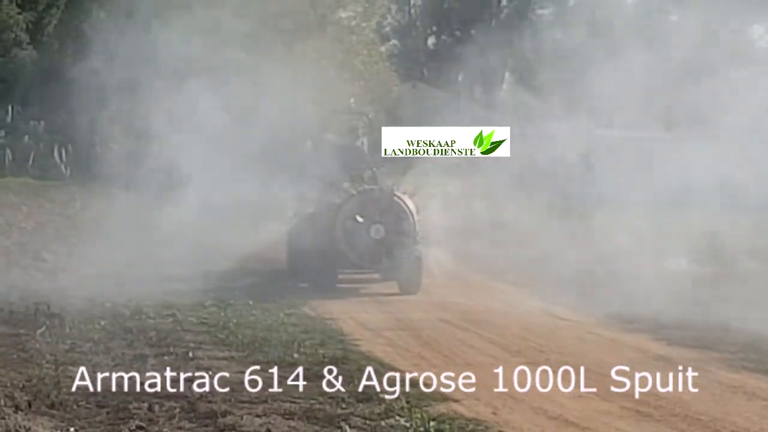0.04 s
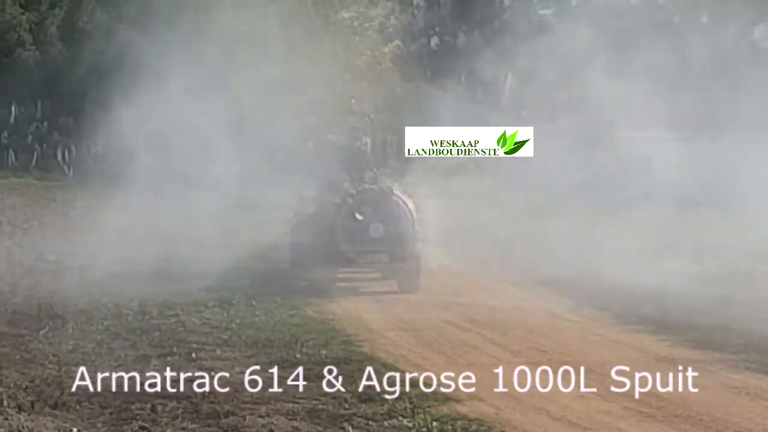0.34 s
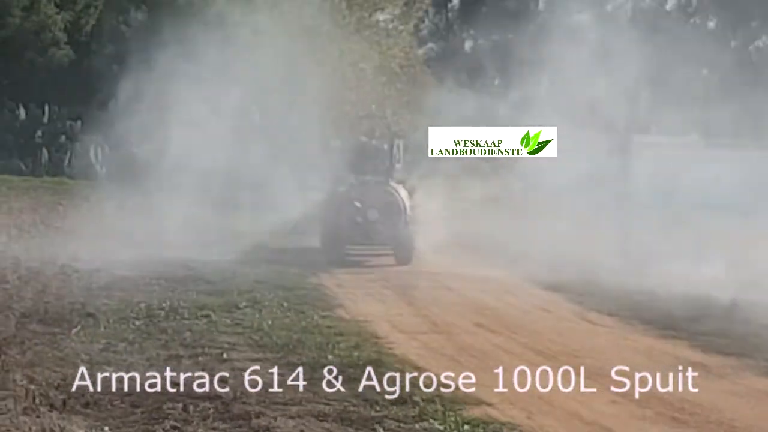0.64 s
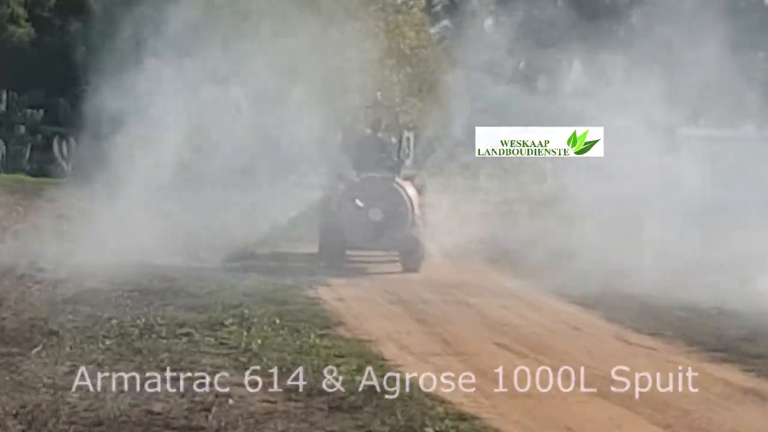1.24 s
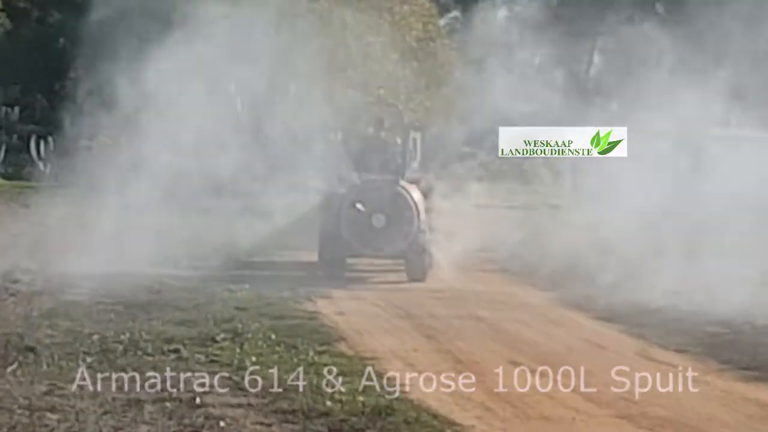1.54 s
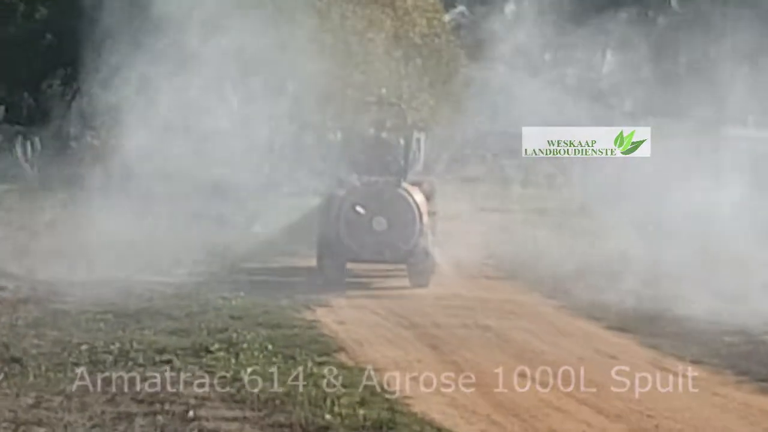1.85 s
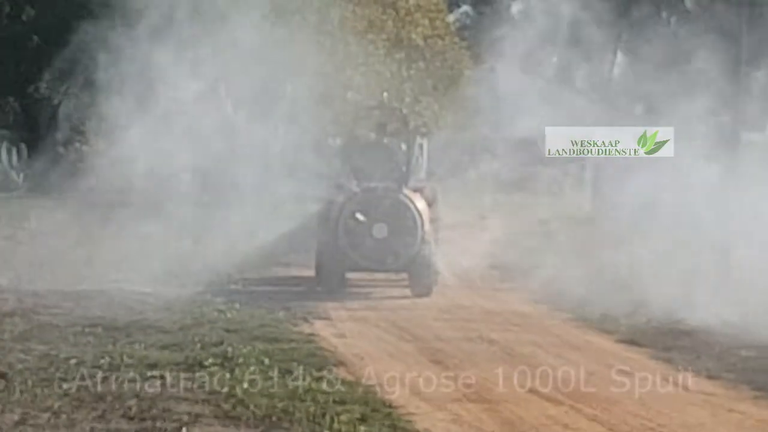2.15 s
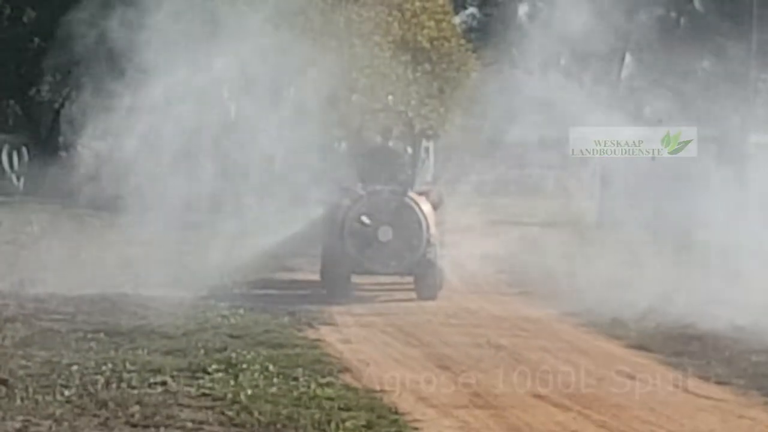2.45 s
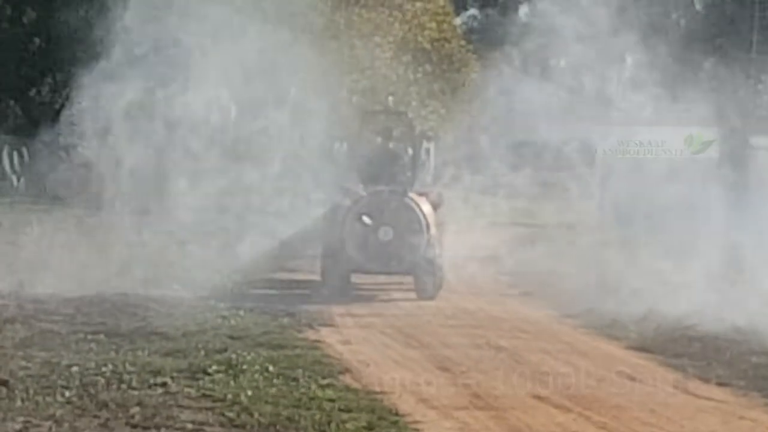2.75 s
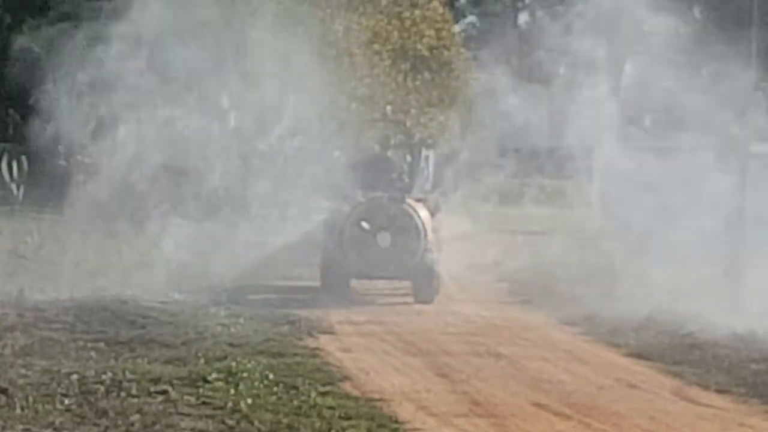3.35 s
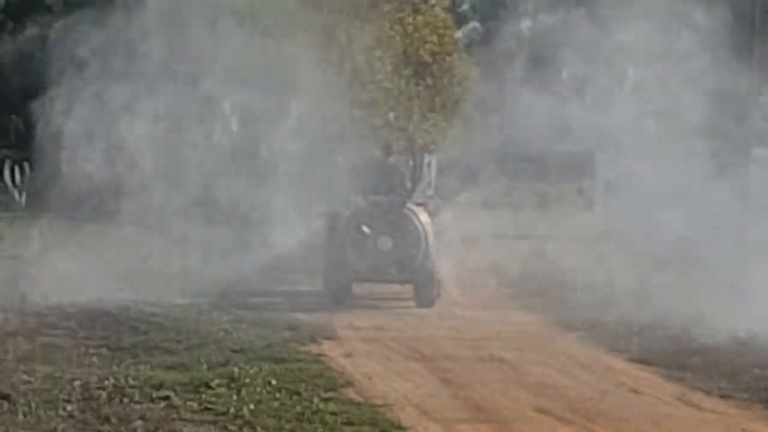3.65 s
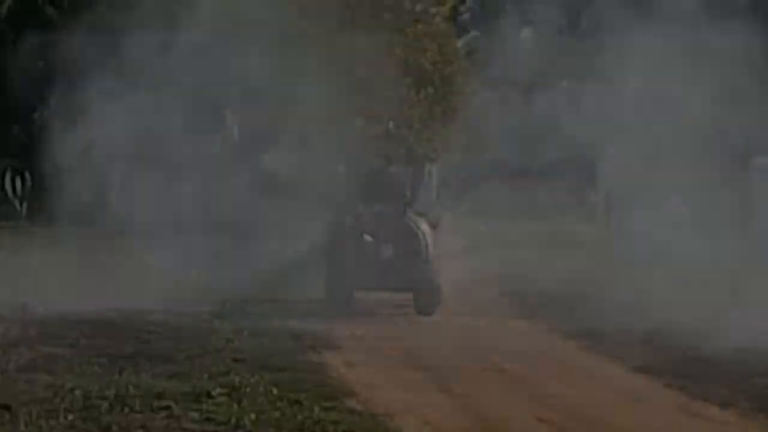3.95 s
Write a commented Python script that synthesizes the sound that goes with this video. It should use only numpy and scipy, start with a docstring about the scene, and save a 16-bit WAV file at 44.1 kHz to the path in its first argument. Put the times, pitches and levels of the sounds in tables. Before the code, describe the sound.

Loud, steady roar of a crop sprayer fan and hissing nozzles behind a humming tractor.

```python
"""A tractor towing an orchard sprayer.

The sprayer runs at full speed as the tractor crawls away along a dirt track. Churning air in its fan
booms and rushes, with a wavering blade tone and two breathy duct rings inside the noise. The engine
hums below, with a faint drive whine and a breeze. Air and spray hiss from the nozzles, swelling and
dulling as the machine moves off. Two microphone ports (openings) close together pick it all up."""
import sys
import numpy as np
from scipy import signal
from scipy.fft import rfft, irfft
from scipy.io import wavfile
from scipy.ndimage import uniform_filter1d, minimum_filter1d

SR = 44100
rng = np.random.default_rng(int(sys.argv[2]) if len(sys.argv) > 2 else 0)


def to_wav(sig):
    """Store sig (one row per channel, or 1-D mono) as 16-bit WAV at the path in sys.argv[1].

    Samples outside -1..1 are clipped; the rate is SR.
    """
    pcm = np.clip(np.atleast_2d(sig), -1, 1) * 32767
    pcm = np.round(pcm).astype(np.int16)
    wavfile.write(sys.argv[1], SR, pcm.T)  # frames by channels


N = 176400  # 4 seconds
TIME = np.arange(N) / SR
FREQS = np.fft.rfftfreq(N, 1 / SR)
FRAMES = dict(nperseg=1024, noverlap=768)  # cuts sound into short overlapping slices


def gain_of(db):
    """Turns decibels into a number to multiply by."""
    return 10 ** (np.asarray(db) / 20)


def unit_level(x):
    """Scales a signal so that its average power is 1."""
    return x / np.sqrt(np.mean(abs(x) ** 2) + 1e-20)


def over_pitch(table):
    """Joins a table's rows into a curve over all frequencies, spaced by octaves."""
    hz, value = np.transpose(table)
    return np.interp(np.log(FREQS + 1), np.log(hz + 1), value)


def over_time(table, times=TIME):
    """Joins a table's rows into a curve over time."""
    return np.interp(times, *np.transpose(table))


def wander(rate_hz):
    """A smooth random wobble, up to about the given rate."""
    smoothing = np.exp(-(FREQS / rate_hz) ** 2) * (FREQS > 0)
    return unit_level(irfft(rfft(rng.standard_normal(N)) * smoothing, N))


def noise_spectra(shape):
    """The spectra of two unrelated noises, both shaped by one table."""
    return rfft(rng.standard_normal((2, N))) * gain_of(over_pitch(shape))


# Which port is louder. Each row: frequency in Hz, left minus right in dB.
PORT_BALANCE = [(40, 2), (130, .3), (320, -.7), (440, -.2), (650, -.6), (900, -1.8), (1050, 0),
                (1450, -1.7), (1720, -1), (1900, -3.5), (2250, -1.3), (2520, -3.7), (2780, -3.8),
                (3050, 1.7), (3250, -.2), (3440, 3.5), (3850, 2.5), (4200, -1), (4600, -1.5), (4900, -4.3),
                (5200, -2), (5600, -6), (6100, -7.5), (6800, 1), (7400, -.8), (8600, 5), (10000, 1),
                (11300, 3.5), (12600, -4), (14200, -4), (15500, 0)]
# Which port hears a wave first. Each row: frequency in Hz, the left one's lead in radians.
PORT_LEAD = [(30, -.15), (90, -.26), (260, -.18), (400, -.11), (780, -.19), (970, 0), (1150, -.25),
             (1600, -.26), (1780, -.48), (2100, -.25), (2450, -.64), (2900, -.77), (3150, .15), (3380, .5),
             (3520, -.4), (3700, -.3), (4050, -.97), (4400, -.7), (4700, -1.05), (5000, -.7), (5400, -1.1),
             (6050, -.65), (6400, .15), (6750, .1), (7050, -1), (7400, -.45), (8200, -1.2), (9200, -3),
             (13000, -3.5), (15000, -2)]

def ports(left, right):
    """Turns two spectra into stereo sound, with the ports' differences in level and timing."""
    lean = gain_of(over_pitch(PORT_BALANCE) / 2) * np.exp(.5j * over_pitch(PORT_LEAD))
    return irfft(np.array([left * lean, right / lean]), N)


# How alike the two ports sound. Each row: frequency in Hz, likeness from 0 to 1.
PORT_LIKENESS = [(30, .96), (120, .996), (300, .999), (440, .989), (650, .994), (950, .976), (1200, .986),
                 (1780, .96), (2050, .975), (2600, .84), (3200, .91), (3440, .6), (3700, .86), (5000, .8),
                 (6000, .64), (6600, .82), (7100, .6), (8000, .63), (9500, .52), (15000, .45)]

def turbulence(shape):
    """Churning air: noise that is nearly the same at both ports in the bass, less so higher up."""
    shared, separate = noise_spectra(shape)
    likeness = np.clip(over_pitch(PORT_LIKENESS), 0, 1)
    right = likeness * shared + np.sqrt(1 - likeness ** 2) * separate
    return unit_level(ports(shared, right))


def moving_air(sound, drift, drift_weight, flutter_db, flutter_hz, patchy_db):
    """Air on the way sways the level: a slow drift, a quick flutter and small random patches."""
    hz, times, slices = signal.stft(sound, SR, **FRAMES)
    patches = uniform_filter1d(rng.standard_normal(slices.shape[1:]), size=14, axis=0)  # across pitch
    patches = unit_level(uniform_filter1d(patches, size=16, axis=1))  # across time
    flutter = np.interp(times, TIME, wander(flutter_hz))
    drift_db = drift_weight(hz)[:, None] * over_time(drift, times)
    change_db = drift_db + flutter_db * flutter + patchy_db * patches
    return signal.istft(slices * gain_of(change_db), SR, **FRAMES)[1][:, :N]


def stirred_tone(hz, db, unsteady, stir_hz):
    """A tone whose strength and timing are stirred by the air."""
    stir = (wander(stir_hz) + 1j * wander(stir_hz)) / np.sqrt(2)
    steady = np.exp(2j * np.pi * np.cumsum(hz) / SR)
    return gain_of(db) * unit_level(((1 + unsteady * stir) * steady).real)


# The breeze's rumble. Each row: frequency in Hz, relative level in dB.
BREEZE_SHAPE = [(10, -3), (30, 0), (60, 4), (90, 6), (140, -6), (300, -32)]

def breeze(db=-56):
    """Light wind rumbles on each port separately."""
    gusts_db = 2.5 * wander(4)
    return gain_of(db + gusts_db) * unit_level(irfft(noise_spectra(BREEZE_SHAPE), N))


def drive_whine(speed, hz=463):
    """The spinning drive gives one faint, unsteady note."""
    return stirred_tone(hz * speed, db=-48, unsteady=0.71, stir_hz=3.6)


# The notes in the engine's hum. Each row: multiple of the crank's turning rate, level in dB.
ENGINE_NOTES = [(1, -60.5), (2, -46.5), (3, -43)]

def engine_hum(speed, crank_hz=40.9):
    """The engine hums at the rate its crank turns, and at multiples of it."""
    return sum(stirred_tone(multiple * crank_hz * speed, db, unsteady=0.22, stir_hz=2.5)
               for multiple, db in ENGINE_NOTES)


# The blades' notes. Each row: multiple of the blade rate, base level in dB, wobble (0 is steady).
BLADE_NOTES = [(1, -28, 0.23), (2, -43, 1.1)]
# How the blade tone comes and goes. Each row: time in seconds, level change in dB.
BLADE_SWELLS = [(0, -4), (.17, -14), (.25, 9.5), (.52, 7), (.8, 8.5), (.95, -1), (1.15, 2), (1.42, 1),
                (1.85, -11.5), (2.03, -0.5), (2.4, 2), (2.6, -7), (2.85, 2), (3.05, -8), (3.3, 2),
                (3.8, 4.5), (4, -6)]

def blade_tone(speed, blade_hz=329):
    """Each passing fan blade pushes the air, and the pushes blend into a wavering tone."""
    notes = sum(stirred_tone(multiple * blade_hz * speed, db, unsteady, stir_hz=9.6)
                for multiple, db, unsteady in BLADE_NOTES)
    return notes * gain_of(over_time(BLADE_SWELLS))


# How the duct's low and high rings come and go. Each row: time in seconds, level change in dB.
LOW_RING_SWELLS = [(0, 6), (.25, 3.5), (.5, 4), (.63, -1), (.76, 2.5), (.95, -5), (1.12, -1), (1.3, -1),
                   (1.45, -2), (1.8, -3), (1.98, 1.5), (2.35, 2), (2.57, -9), (2.8, 2), (3.3, -6),
                   (3.52, 1.5), (3.72, -3), (4, -4)]
HIGH_RING_SWELLS = [(0, 1), (.35, 1), (.5, 4.5), (1.1, -7), (1.35, -1), (1.55, -3), (1.85, 1), (2.1, -2),
                    (2.55, -4), (2.85, 3.5), (3.15, -3), (3.55, 0), (4, -15)]

def duct_ring(swells, hz, width_hz, db):
    """The air stream makes the fan's duct ring with a fluttering, breathy whine."""
    flutter = wander(width_hz) + 1j * wander(width_hz)
    ring = unit_level((flutter * np.exp(2j * np.pi * hz * TIME)).real)
    spectrum = rfft(ring * gain_of(db + over_time(swells)))
    return ports(spectrum, spectrum)


# The echo off the ground, whose dips climb in pitch as the machine moves away.
# Each row: time in seconds, spacing of the dips in Hz, echo strength from 0 to 1.
GROUND_BOUNCE = [(0, 2900, .16), (.22, 3060, 0.2), (.6, 3100, 0.02), (1.5, 3250, 0), (2.4, 3400, 0),
                 (3.1, 3600, 0), (3.4, 3750, .28), (4, 3680, 0.2)]

def ground_echo(sound, scatter_hz=7500):
    """Soft ground sends back an upside-down echo that weakens evenly spaced frequencies."""
    hz, times, slices = signal.stft(sound, SR, **FRAMES)
    when, dip_hz, strength = np.transpose(GROUND_BOUNCE)
    scattering = 1 + (hz[:, None] / scatter_hz) ** 4  # rough ground returns less treble
    echo = np.interp(times, when, strength) / scattering
    delay = np.exp(-2j * np.pi * hz[:, None] / np.interp(times, when, dip_hz))
    return signal.istft(slices * (1 - echo * delay), SR, **FRAMES)[1][:, :N]


# The spray's hiss. Each row: frequency in Hz, relative level in dB.
HISS_SHAPE = [(1500, -29), (2500, -2.5), (2790, 4), (3000, -2), (3220, 5.5), (3440, -2.5), (3620, 2),
              (4400, 1.4), (5400, 0.2), (5800, -9), (6100, -8.5), (6830, -18.5), (7400, -13.2), (8000, -12),
              (8900, -19.5), (9900, -28.5), (11300, -22), (12600, -38), (14400, -23), (15100, -36),
              (15600, -37)]
# How the hiss swells and fades. Each row: time in seconds, level change in dB at centre_hz.
HISS_SWELLS = [(0, 0), (.2, 3), (.42, 1.4), (.6, 2.2), (.75, 0.9), (1.03, 1.4), (1.2, 0.3), (1.58, 2),
               (1.8, 1.3), (2.05, 1), (2.4, .6), (2.55, -1.6), (2.68, -0.5), (3.05, -2.5), (3.2, -0.7),
               (3.36, -3.5), (3.66, -2), (4, -3.5)]

def spray(db=-28, centre_hz=4070, swing_per_octave=0.34):
    """Nozzles hiss into the air stream; the higher hiss swings further, so it dulls as it fades."""
    weight = lambda hz: 1 + swing_per_octave * np.clip(np.log2((hz + 1) / centre_hz), -1, 1)
    hiss = turbulence(HISS_SHAPE)
    hiss = moving_air(hiss, HISS_SWELLS, weight, flutter_db=0.62, flutter_hz=22, patchy_db=0.67)
    return gain_of(db) * ground_echo(hiss)


# The broad humps of the fan's rush. Each row: frequency in Hz, relative level in dB.
RUSH_SHAPE = [(200, -54), (400, -12), (470, -9), (560, -4), (680, -3.5), (800, -3), (900, -10), (970, -10),
              (1120, -3.5), (1250, -3), (1350, -6.5), (1470, -1.5), (1550, -4.5), (1610, -3), (1760, -7),
              (1900, -3.5), (2015, -3), (2100, -4.5), (2210, -3.5), (2350, -11.5), (2480, -16.5),
              (2790, -14.5), (3050, -23.5), (4500, -50)]
# How the upper rush fades. Each row: time in seconds, level change in dB.
RUSH_FADE = [(0, 2), (.33, 1.3), (.58, 2), (1.1, 0.9), (1.6, 0.9), (2.2, 0), (2.55, -1), (2.9, 0),
             (3.35, -2), (3.6, -1), (4, -2.5)]

def fan_rush(db=-16, fades_from_hz=650, fades_fully_hz=1450):
    """The blades tear the air; the top of this rush fades with distance while the low end holds."""
    weight = lambda hz: np.interp(hz, [fades_from_hz, fades_fully_hz], [0, 1])
    rush = turbulence(RUSH_SHAPE)
    rush = moving_air(rush, RUSH_FADE, weight, flutter_db=0.27, flutter_hz=25, patchy_db=0.58)
    return gain_of(db) * rush


# The fan's low boom. Each row: frequency in Hz, relative level in dB.
BOOM_SHAPE = [(10, -42), (30, -40), (50, -34), (70, -29), (100, -18.5), (130, -14), (165, -8), (200, -5),
              (232, 0.5), (265, 0), (305, -4), (345, -2.5), (365, -10.5), (400, -17), (450, -28),
              (700, -74)]
# The boom's slow rise and fall. Each row: time in seconds, level change in dB.
BOOM_SWELLS = [(0, 1.2), (.5, -1.5), (1.1, -0.3), (1.25, -1), (2, -1), (2.3, -0.7), (3, 0), (3.4, 0.1),
               (4, 0.5)]

def fan_boom(db=-15.5, steadying=0.25, window_s=0.039):
    """Air roars low in the fan's housing, steadier than freely churning air."""
    roar = turbulence(BOOM_SHAPE)
    power = (abs(signal.hilbert(roar)) ** 2).mean(0)
    power = uniform_filter1d(power, size=int(window_s * SR))
    roar = unit_level(roar / (power + 1e-9) ** steadying)  # partly evens out the swings
    return gain_of(db + over_time(BOOM_SWELLS)) * roar


def scene():
    """Adds up the fan's noise, the spray, the machine's tones and the breeze."""
    fan = fan_boom() + fan_rush()
    fan += duct_ring(LOW_RING_SWELLS, hz=1525, width_hz=48, db=-25.5)
    fan += duct_ring(HIGH_RING_SWELLS, hz=2015, width_hz=69, db=-28.5)
    hiss = spray()
    speed = 1 + 0.0014 * wander(2.1)  # engine, blades and drive share one nearly steady speed
    tones = rfft(engine_hum(speed) + blade_tone(speed) + drive_whine(speed))
    return fan + hiss + ports(tones, tones) + breeze()


def record(dry, ceiling=0.95, top_hz=15780):
    """Quickly turns down any peak above the ceiling, then cuts the highest treble."""
    allowed_gain = np.minimum(1, ceiling / (abs(dry).max(0) + 1e-9))
    smooth_gain = uniform_filter1d(minimum_filter1d(allowed_gain, size=161), size=161)
    treble_cut = signal.firwin(511, top_hz, window=("kaiser", 9), fs=SR)
    return signal.oaconvolve(dry * smooth_gain, treble_cut[None], "same")


dry = scene()
out = record(dry)
to_wav(out)
```